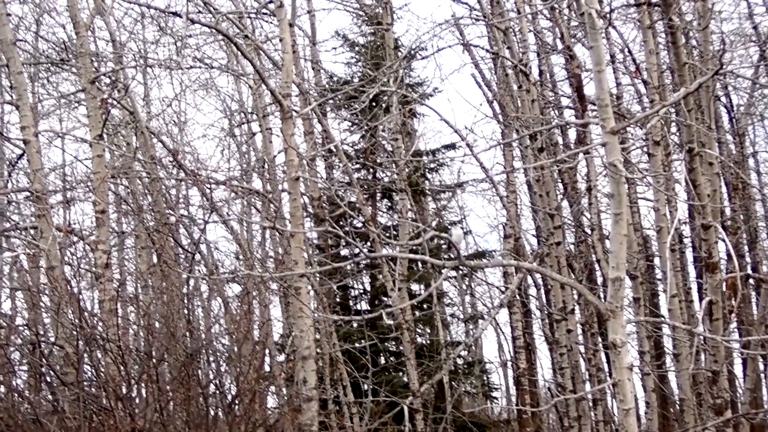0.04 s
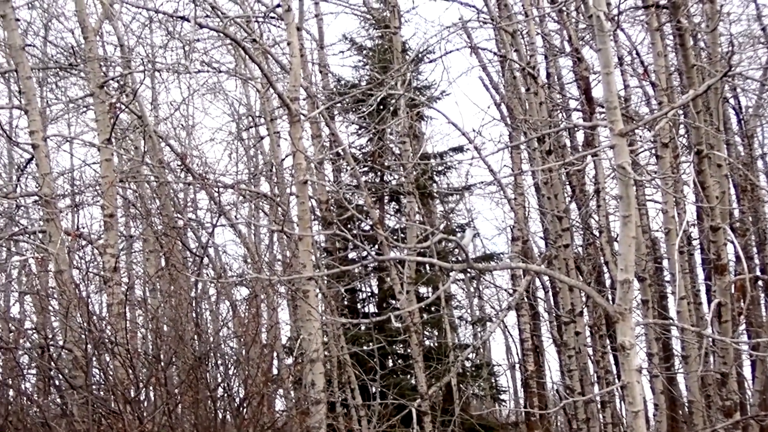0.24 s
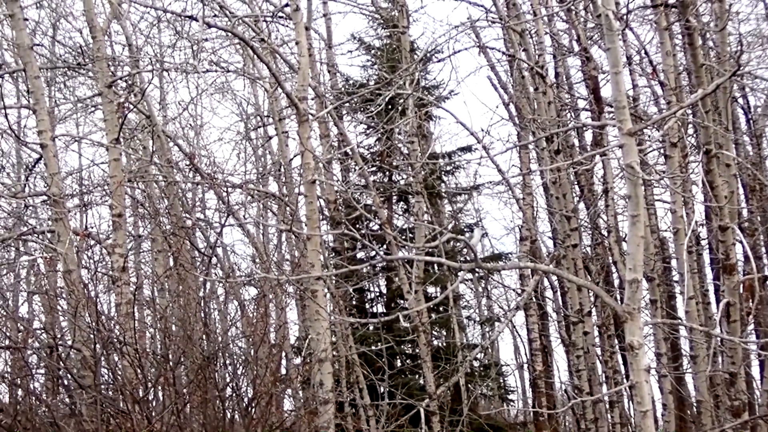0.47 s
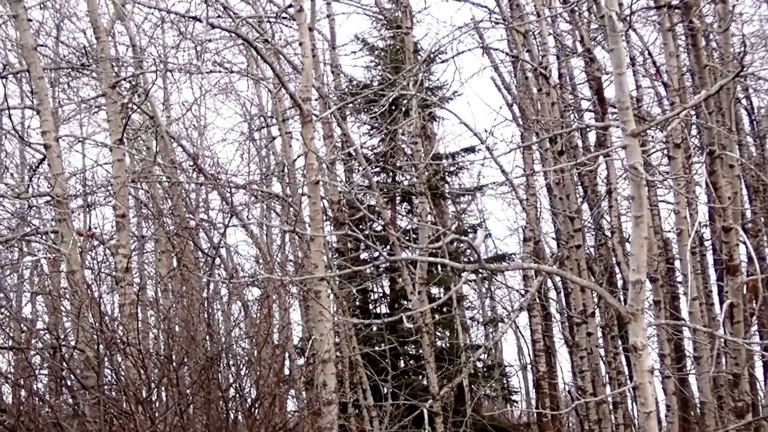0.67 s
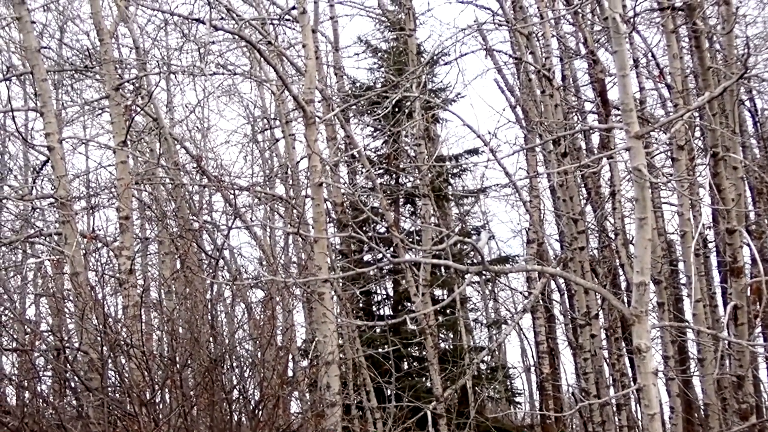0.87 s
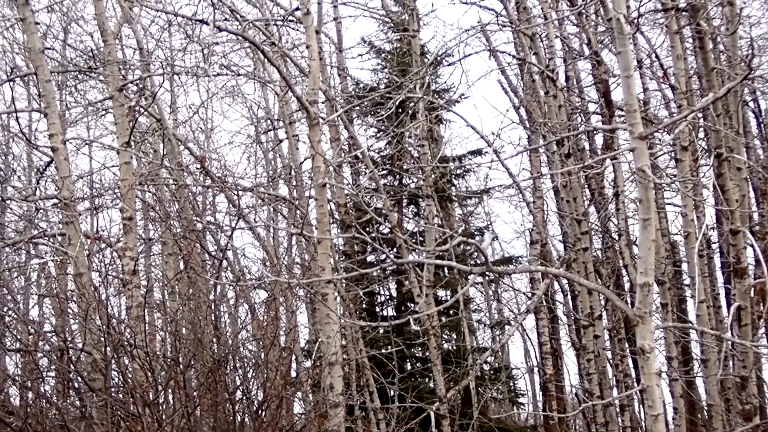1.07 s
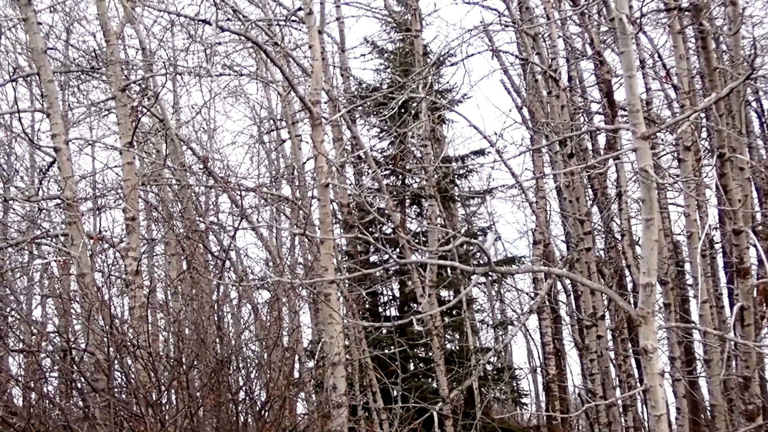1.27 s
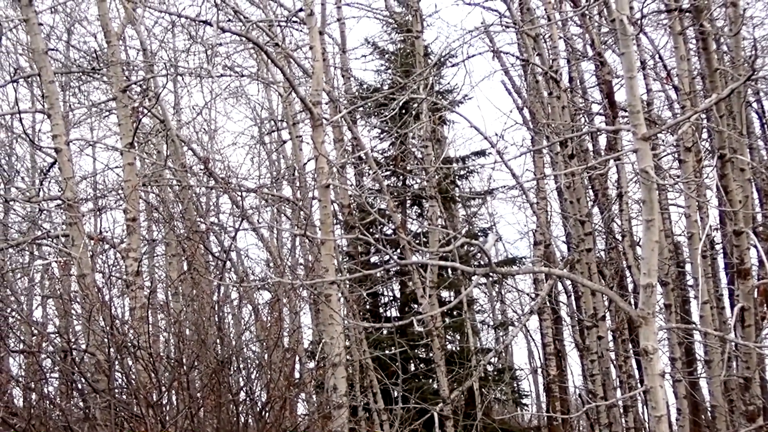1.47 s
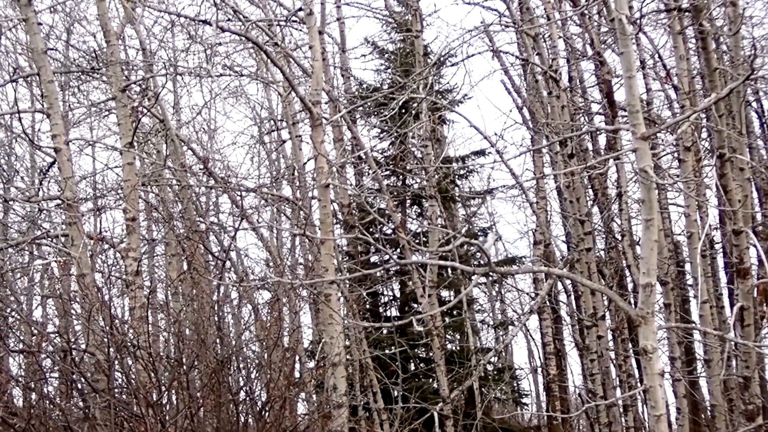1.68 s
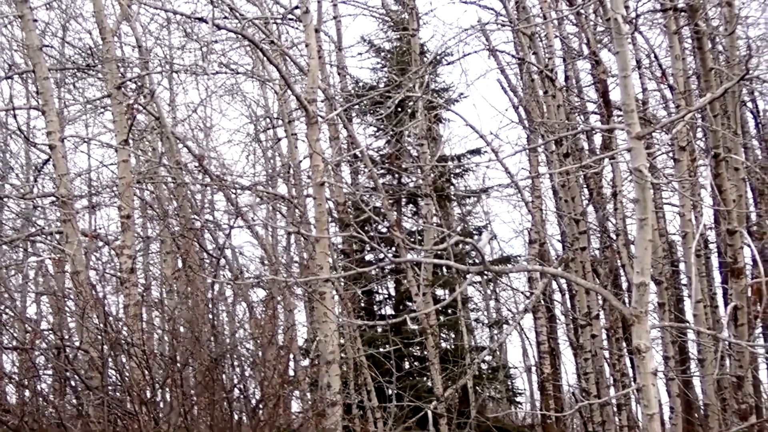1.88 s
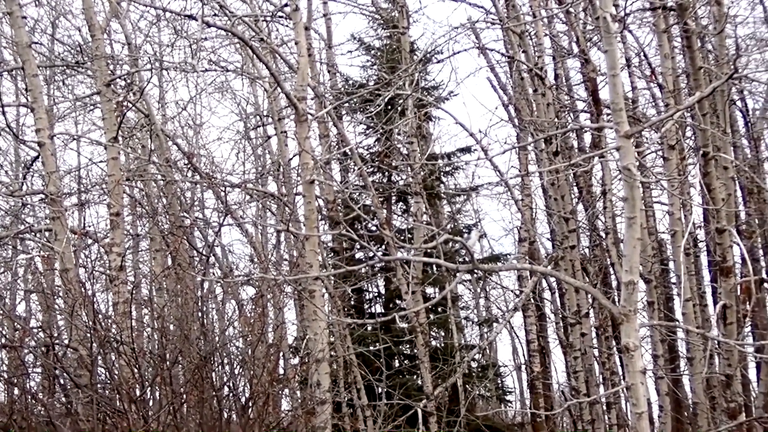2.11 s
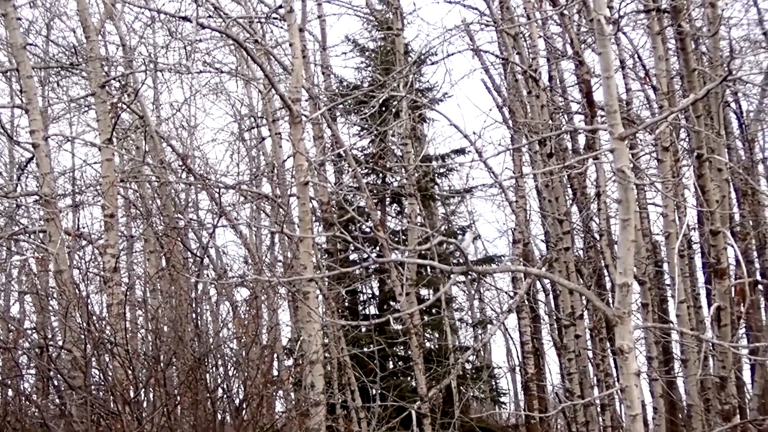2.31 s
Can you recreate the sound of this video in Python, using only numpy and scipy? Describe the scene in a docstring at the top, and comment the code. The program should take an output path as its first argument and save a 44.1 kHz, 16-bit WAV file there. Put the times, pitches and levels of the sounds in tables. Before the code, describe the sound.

A nuthatch calls a quick run of nasal notes over steady woodland hiss.

```python
"""Steady hiss and low rumble fill a bare wood. Off to the right a nuthatch starts fifteen quick nasal
notes, each a rising glide that drops at its end. A strong early echo beats with the glide and splits
each note into pulses; trunks scatter a faint tail. Two soft low bumps sound on the left under the first
notes, and a small far bird chirps once, thin and high, halfway through. Two more bumps come near the
end, and one tick follows the last note."""
import sys
import numpy as np
from scipy import signal
from scipy.fft import rfft, irfft, next_fast_len
from scipy.io import wavfile
from scipy.ndimage import uniform_filter1d

SR = 44100
rng = np.random.default_rng(int(sys.argv[2]) if len(sys.argv) > 2 else 0)


def generate_wav(signal):
    """Clip the signal to [-1, 1] and save it as 16-bit WAV at the path in sys.argv[1]."""
    frames = np.transpose(np.atleast_2d(signal))
    scaled = np.clip(frames, -1, 1) * 32767
    pcm = np.round(scaled).astype(np.int16)
    wavfile.write(sys.argv[1], SR, pcm)


N = 108045
TIME = np.arange(N) / SR
FREQS = np.maximum(np.arange(N // 2 + 1) * SR / N, 1)


def nuthatch():
    """The bird's run of notes, with early echoes and a tail scattered by the wood."""
    # the notes: start_s, length_s, top_pitch_hz, level_db, rise_depth (1 = the usual rise)
    notes = [(.2213, .0468, 760, -47, .45), (.3194, .0787, 771, -38.8, .9),
             (.4365, .0895, 773.6, -37.4, 1.04), (.5653, .089, 780.8, -36, 1.04),
             (.6938, .0935, 784.4, -35.5, 1.05), (.8261, .0946, 786.6, -35.9, 1.11),
             (.9587, .0971, 788.2, -35.9, 1.03), (1.0918, .0975, 787.9, -36.1, 1.04),
             (1.2318, .0932, 791.1, -35.6, 1.02), (1.368, .0935, 790.8, -35.6, 1.04),
             (1.5015, .096, 787.8, -36.3, 1.04), (1.6387, .0984, 788.3, -35.9, 1.07),
             (1.7773, .0981, 786.9, -35.4, 1), (1.9162, .0971, 783.7, -35.8, .97),
             (2.0562, .1014, 783.1, -36.5, .96)]
    # early echoes at each ear: delay_s, gain
    left_echoes = [(.004543, .83)]
    right_echoes = [(.002182, .127), (.004584, .68), (.007622, .14)]
    # tails from near twigs and far trunks: delay_s, fade_s, left_db, right_db
    tails = [(.008, 0.11, -42, -8.5), (0.04, 0.798, -40, -15.5)]
    # tone of the scattered sound: frequency_hz, gain_db
    tail_colour = [(1400, -8.5), (1750, 4), (2100, -4), (2230, -3), (2340, -5.5), (2700, -1), (3100, -7)]
    voice = sum(nasal_note(*row) for row in notes)
    left = from_db(-23) * add_echoes(voice, left_echoes)  # the ear away from the bird
    right = add_echoes(voice, right_echoes)
    coloured = irfft(rfft(voice) * from_db(at_hz(tail_colour, FREQS)), N)
    wood = sum(from_db([[left_db], [right_db]]) * scattered_tail(coloured, delay_s, fade_s)
               for delay_s, fade_s, left_db, right_db in tails)
    return np.array([left, right]) + wood


def nasal_note(start_s, length_s, top_pitch_hz, level_db, rise_depth):
    """Six harmonics (multiples of the pitch) glide up through the throat's resonance and fall back."""
    # the glide of every note: share_of_note, share_of_top_pitch
    glide_shape = [(0, .805), (.15, .858), (.3, .915), (.5, .965), (.62, .987), (.72, .994), (.82, .977),
                   (.87, .928), (.91, .858), (.95, .751), (1, .68)]
    # how hard the bird pushes: share_of_note, effort_db
    effort_shape = [(0, -24.5), (.12, -12), (.22, -9.5), (.3, -6.5), (.5, -1.04), (.62, -0.3), (.72, 1.66),
                    (.82, -0.9), (.87, -1), (.91, -8.5), (.95, -5), (1, -11.5)]
    # the throat favours the third harmonic: frequency_hz, gain_db
    throat = [(700, -38), (1000, -39), (1300, -17.5), (1550, -21), (1850, -7.7), (2100, 2), (2300, 0.9),
              (2700, -18), (3100, -20), (3500, -27.5), (3900, -37.5), (4700, -46)]
    drop_s, drop_from, edge_s, waver_s, full_effort_db = .017, .82, .002, .002, -36
    inside = (TIME > start_s) & (TIME < start_s + length_s)
    # the rise stretches with the note; the final drop always takes drop_s
    progress = np.interp(TIME[inside] - start_s, [0, length_s - drop_s, length_s], [0, drop_from, 1])
    glide = along(glide_shape, progress)
    rising = np.arange(len(progress)) < np.argmax(glide)
    smooth_hz = top_pitch_hz * (1 - np.where(rising, rise_depth, 1) * (1 - glide))
    # the pitch is slightly unsteady, and the voice breaks up as it drops
    waver = unit_level(uniform_filter1d(rng.standard_normal(N), int(waver_s * SR)))[inside]
    roughness = np.interp(progress, [drop_from, 1], [.001, .027])
    pitch_hz = smooth_hz * (1 + waver * roughness)
    phase = 2 * np.pi * np.cumsum(pitch_hz) / SR
    effort_db = level_db + along(effort_shape, progress)
    # dB per harmonic: soft moments are duller, and so are soft notes as a whole
    tilt_db = .36 * (effort_db - full_effort_db) + .39 * (level_db - full_effort_db)
    voice = sum(from_db(effort_db + tilt_db * (k - 3) + at_hz(throat, k * pitch_hz)) * np.sin(k * phase)
                for k in range(1, 7))
    edge_fade = np.clip(np.minimum(progress, 1 - progress) * length_s / edge_s, 0, 1)
    sound = np.zeros(N)
    sound[inside] = voice * edge_fade
    return sound


def add_echoes(sound, echoes):
    """Add delayed copies, which strengthen some pitches and cancel others."""
    # treble lost in the bounce: frequency_hz, gain_db
    echo_colour = [(2400, 0), (2800, -9), (3300, -9), (3800, -3)]
    size = next_fast_len(N + SR // 10)
    hz = np.arange(size // 2 + 1) * SR / size
    copies = sum(gain * np.exp(-2j * np.pi * hz * delay_s) for delay_s, gain in echoes)
    dulling = from_db(at_hz(echo_colour, np.maximum(hz, 1)))
    return irfft(rfft(sound, size) * (1 + copies * dulling), size)[:N]


def scattered_tail(sound, delay_s, fade_s):
    """Many tiny echoes blur into a tail, different at each ear, that falls 60 dB in fade_s."""
    tail = rng.standard_normal((2, N)) * from_db(-60 * TIME / fade_s) * (TIME > delay_s)
    tail /= np.sqrt(np.sum(tail ** 2, axis=1, keepdims=True))
    return signal.fftconvolve(sound[None], tail, axes=1)[:, :N]


def high_chirp():
    """A small far bird's thin falling whistle, blurred by distance."""
    # the whistle's path: time_s, pitch_hz, level_db
    path = [(1.235, 8670, -84), (1.243, 8150, -57), (1.252, 7090, -60.5), (1.264, 6850, -64),
            (1.273, 6600, -66)]
    time_s, pitch_hz, level_db = np.transpose(path)
    phase = 2 * np.pi * np.cumsum(np.interp(TIME, time_s, pitch_hz)) / SR
    sounding = (TIME > time_s[0]) & (TIME < time_s[-1])
    whistle = np.sin(phase) * from_db(np.interp(TIME, time_s, level_db)) * sounding
    return whistle + from_db(2.5) * scattered_tail(whistle, delay_s=0, fade_s=.41)


def low_bumps():
    """Four soft, dull bumps on the left."""
    # the bumps: middle_s, level_db, pitch_hz
    bumps = [(0.293, -44, 162), (0.4194, -47.5, 147), (1.816, -53, 167), (1.989, -56, 139)]
    left = sum(from_db(level_db) * blip(middle_s, pitch_hz, width_s=.0038)
               for middle_s, level_db, pitch_hz in bumps)
    return np.array([left, from_db(-38) * left])


def dry_tick():
    """One tick on the right: a tiny blip with a shorter, higher snap on top."""
    middle_s = 2.2043
    body = from_db(-41.5) * blip(middle_s, pitch_hz=1700, width_s=.00045)
    snap = from_db(-48.5) * blip(middle_s, pitch_hz=3060, width_s=.00024)
    right = body + snap
    return np.array([from_db(-23) * right, right])


def blip(middle_s, pitch_hz, width_s):
    """A very short tone that swells and fades in a bell shape."""
    offset_s = TIME - middle_s
    return np.sin(2 * np.pi * pitch_hz * offset_s) * np.exp(-.5 * (offset_s / width_s) ** 2)


def background():
    """Even hiss, low outdoor rumble and a faint wavering hum, all shaped from noise."""
    # tone of the hiss and of the rumble: frequency_hz, gain_db
    hiss_colour = [(1000, -6), (1300, -6), (1900, -10), (2900, -11.5), (3300, -13), (3900, -16.5),
                   (4400, -16.5), (4850, -15), (5400, -7.5), (6650, -6.5), (7650, -0.5), (8450, -4),
                   (9250, -9.5), (12800, -8.5), (15500, -12)]
    rumble_colour = [(20, 3), (35, -24), (55, -1.5), (90, -4.5), (125, -3.5), (200, -7.5), (520, -7),
                     (700, -7), (1000, -9.5)]
    hum_hz, hum_width_hz = 123.6, 3.7
    treble = FREQS > 1000
    hiss = from_db(-61.5) * stereo_noise(from_db(at_hz(hiss_colour, FREQS)) * treble)
    rumble = from_db(-67.5) * stereo_noise(from_db(at_hz(rumble_colour, FREQS)) * ~treble)
    hum = from_db(-82) * stereo_noise(1 / (1 + ((FREQS - hum_hz) / hum_width_hz) ** 2))
    return hiss + rumble + hum


def stereo_noise(colour):
    """Steady noise, partly shared by the two ears; colour is its gain at each frequency."""
    # which side is louder: frequency_hz, left_minus_right_db
    balance = [(30, -16), (60, 7), (200, 0.5), (380, 1), (700, -5), (1300, 1.5), (2400, -1), (4400, -0.5),
               (15000, 0.8)]
    # how alike the ears are: frequency_hz, likeness (0 = unrelated, 1 = the same)
    likeness = [(60, 0.48), (130, 0.62), (300, 0.078), (640, 0.14), (1400, 0), (15000, 0.071)]
    shared, opposed = rfft(rng.standard_normal((2, N)))
    alike = at_hz(likeness, FREQS)
    sides = np.array([[1], [-1]])
    ears = np.sqrt(1 + alike) * shared + np.sqrt(1 - alike) * opposed * sides
    lean = from_db(sides * at_hz(balance, FREQS) / 2)
    return unit_level(irfft(ears * colour * lean, N))


def from_db(db):
    """Turn decibels into a number to multiply by."""
    return 10 ** (np.asarray(db) / 20)


def unit_level(sound):
    """Scale a sound so that its average (rms) level is 1."""
    return sound / np.sqrt(np.mean(sound ** 2) + 1e-20)


def along(points, position):
    """Read a two-column table, joining its points with straight lines."""
    return np.interp(position, *np.transpose(points))


def at_hz(points, hz):
    """Read a table by frequency, giving every octave equal room."""
    frequency_hz, value = np.transpose(points)
    return np.interp(np.log(hz), np.log(frequency_hz), value)


def scene():
    """Everything heard in the wood."""
    return nuthatch() + high_chirp() + low_bumps() + dry_tick() + background()


def record(dry):
    """Cut off the very highest treble steeply."""
    cutoff_hz, slope_width_hz = 15900, 150
    passed = np.clip((cutoff_hz - FREQS) / slope_width_hz + .5, 0, 1)
    return irfft(rfft(dry) * passed, N)


dry = scene()
out = record(dry)
generate_wav(out)
```